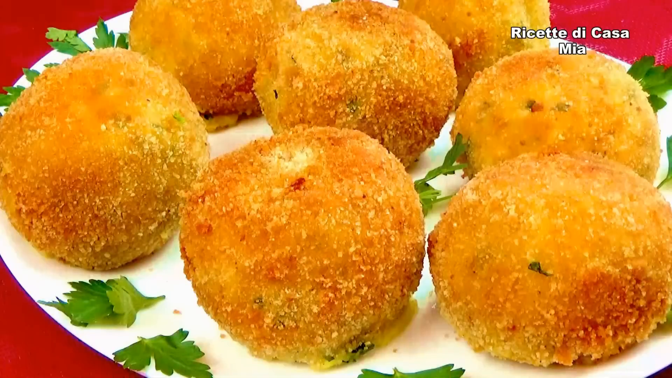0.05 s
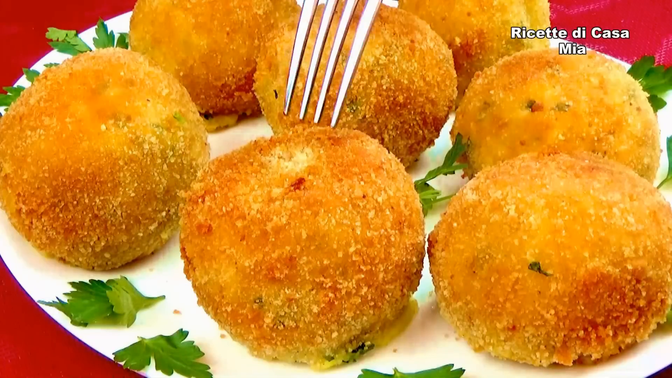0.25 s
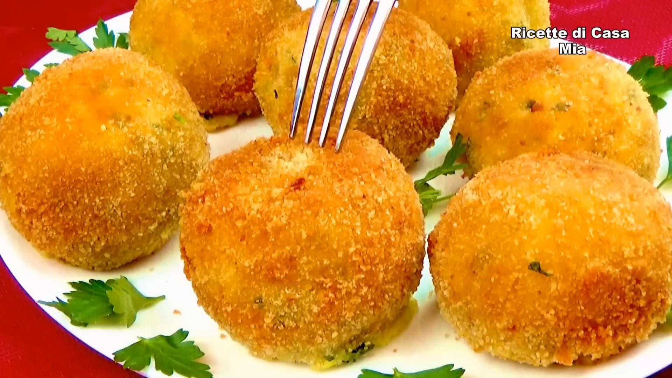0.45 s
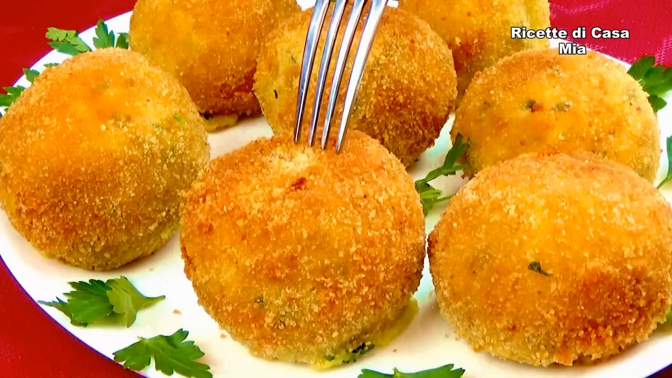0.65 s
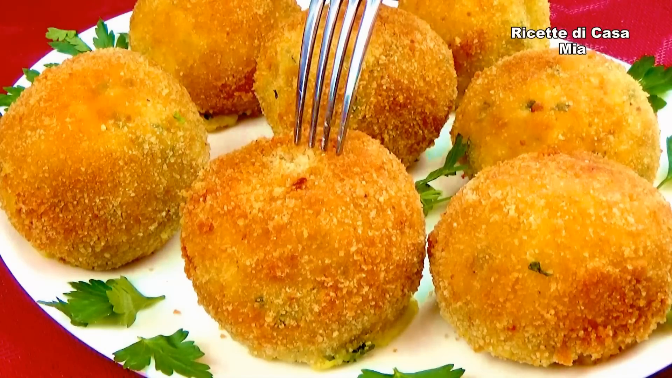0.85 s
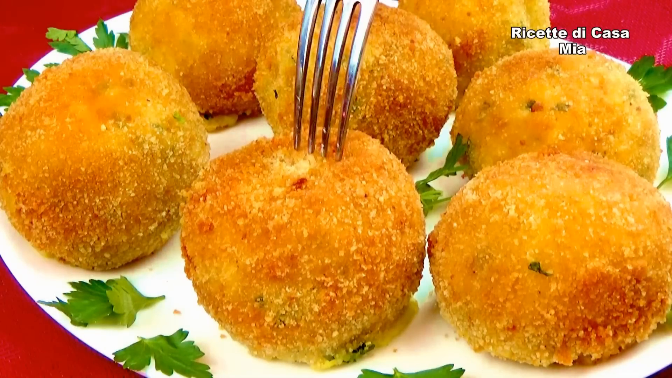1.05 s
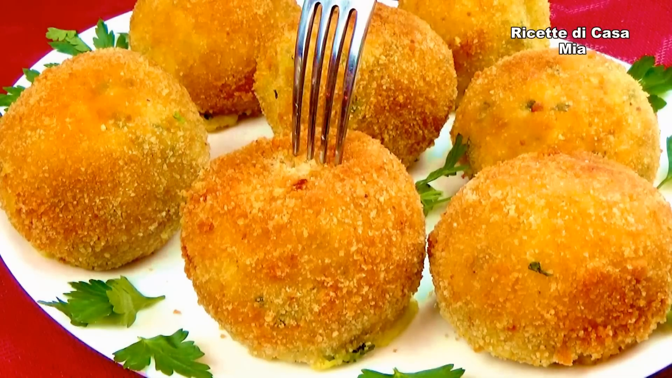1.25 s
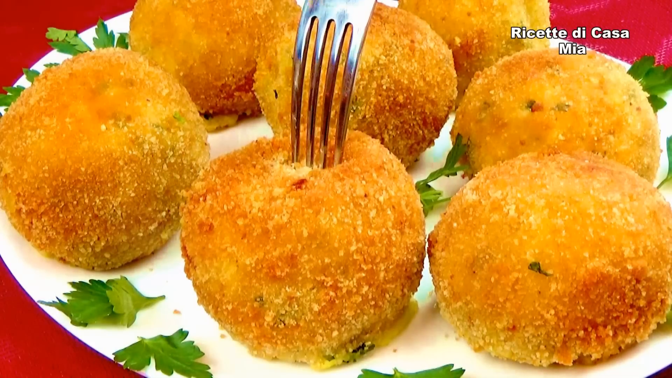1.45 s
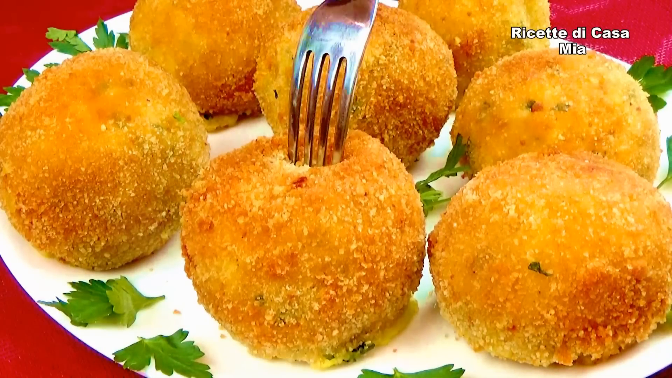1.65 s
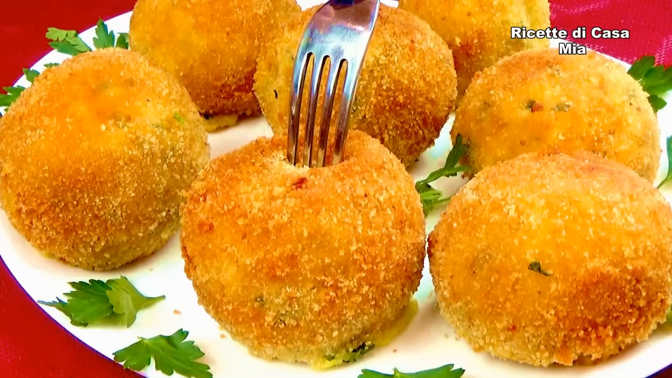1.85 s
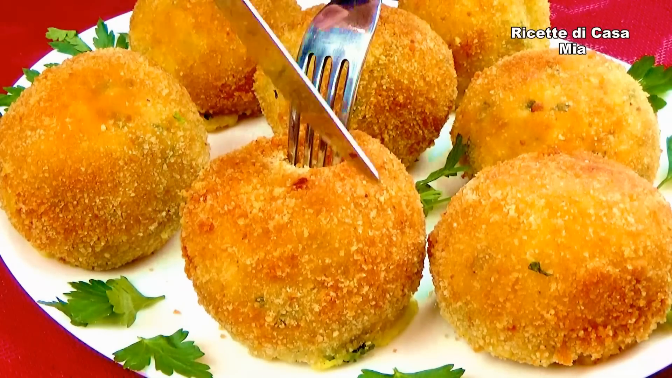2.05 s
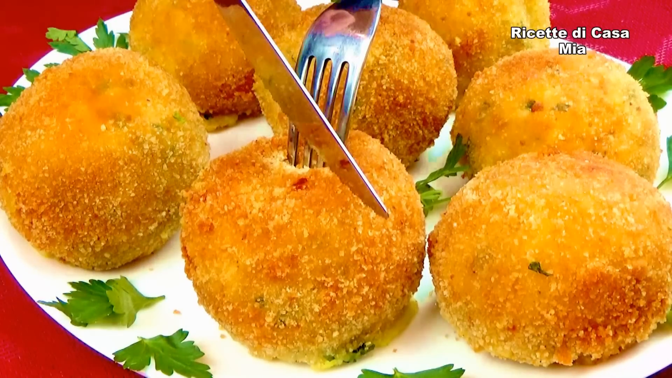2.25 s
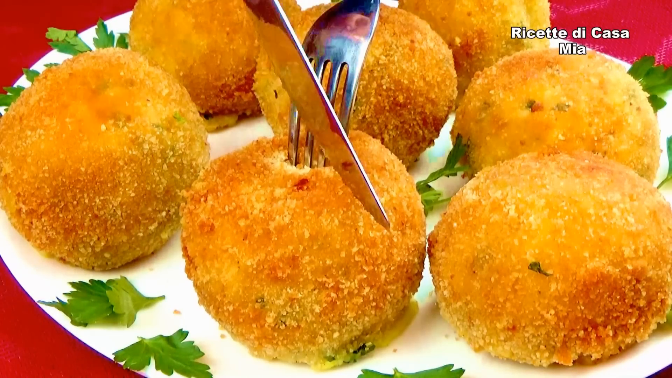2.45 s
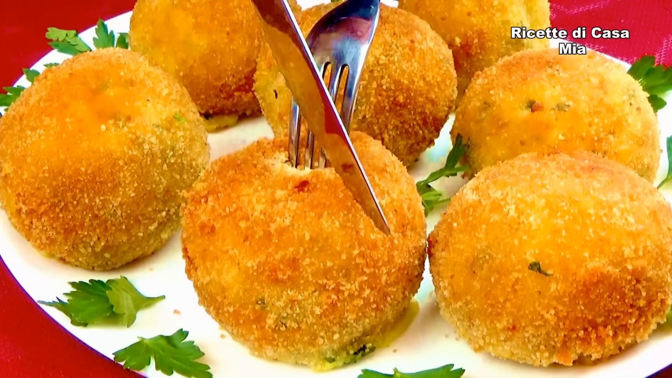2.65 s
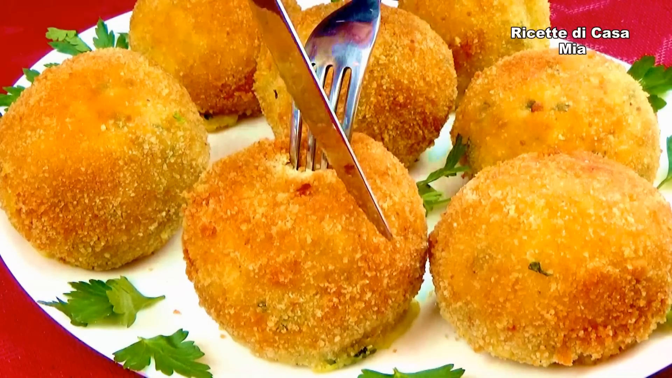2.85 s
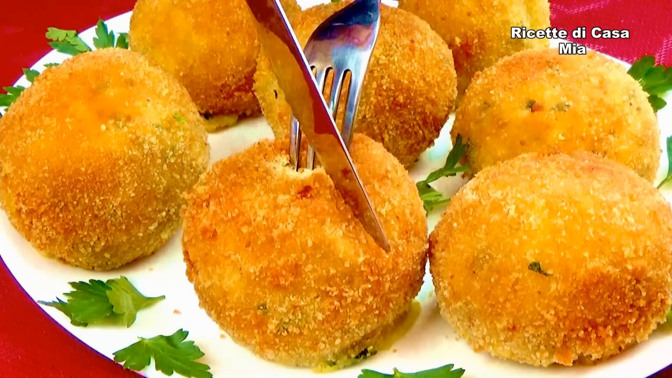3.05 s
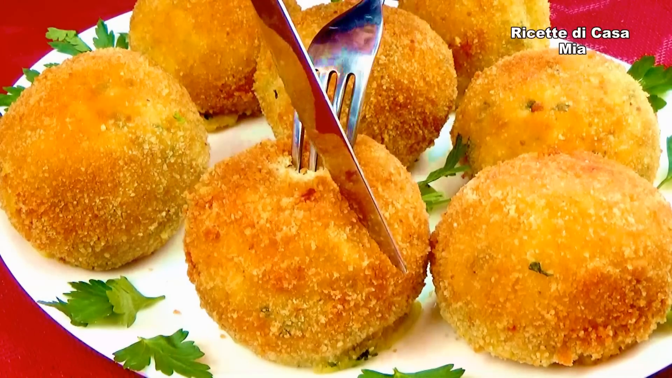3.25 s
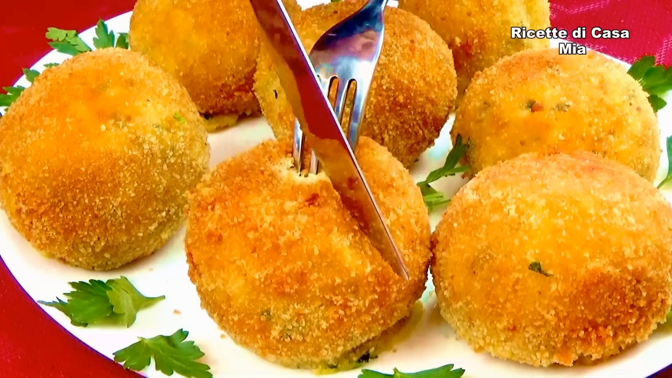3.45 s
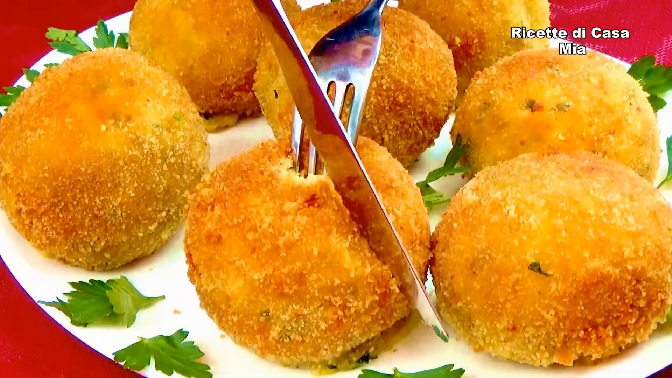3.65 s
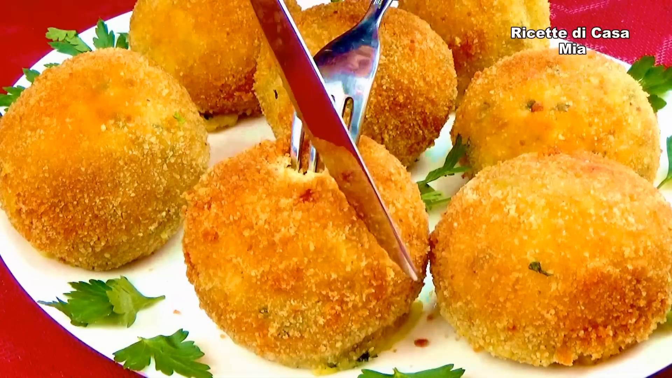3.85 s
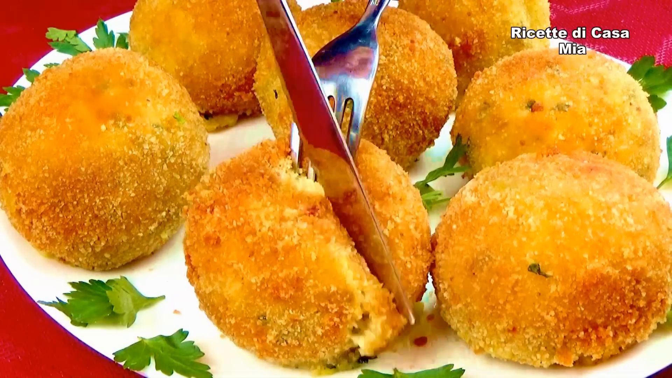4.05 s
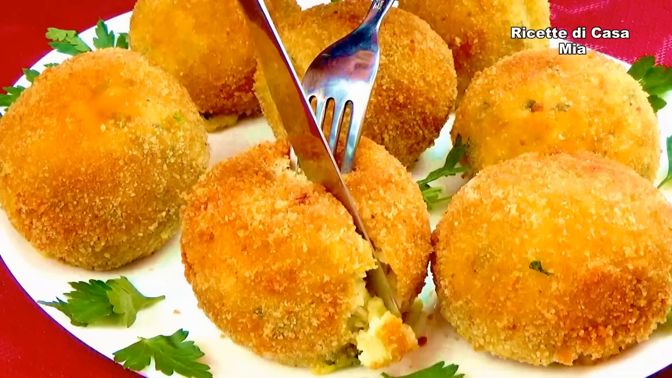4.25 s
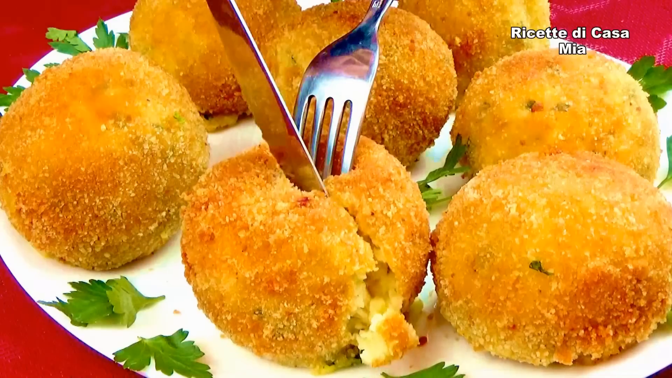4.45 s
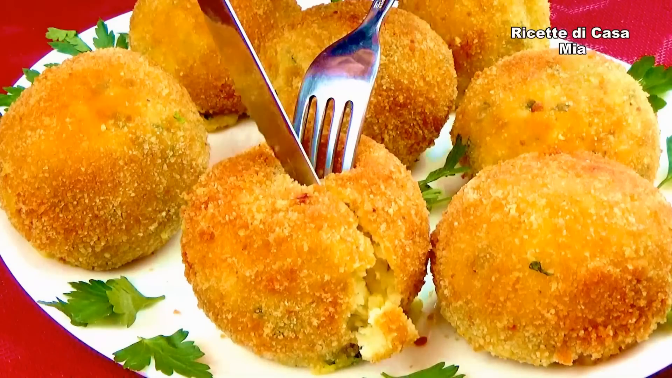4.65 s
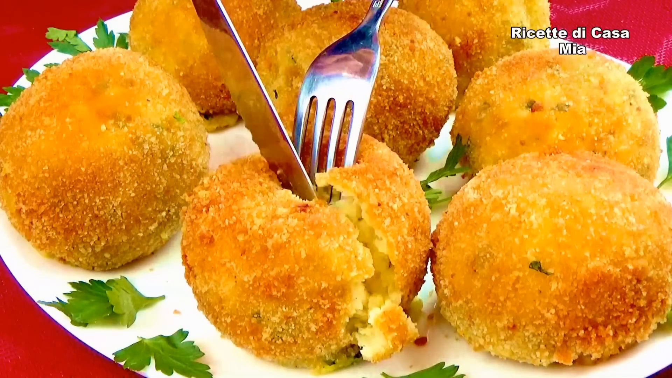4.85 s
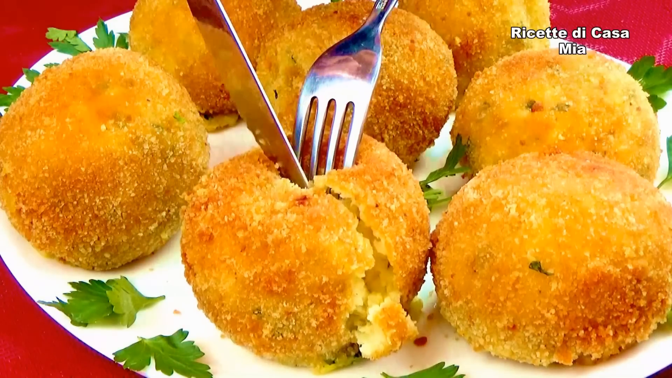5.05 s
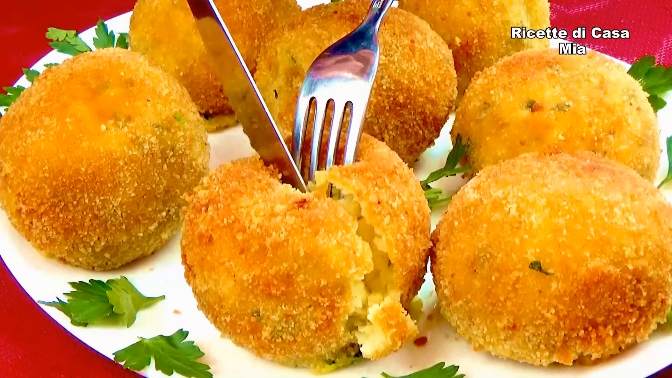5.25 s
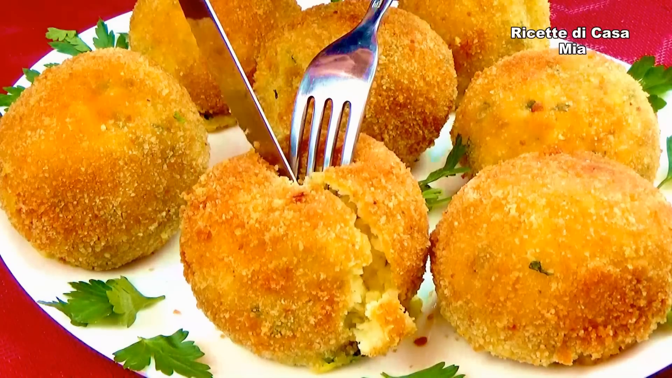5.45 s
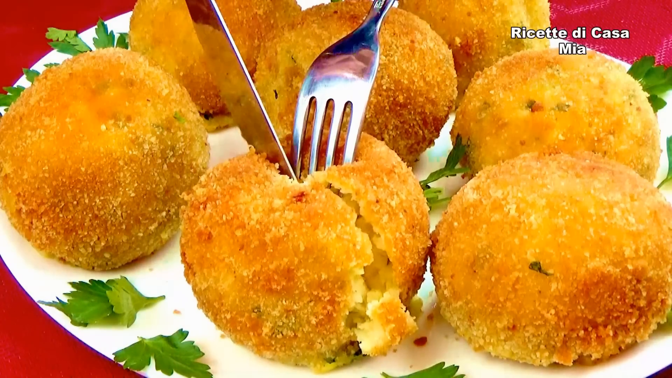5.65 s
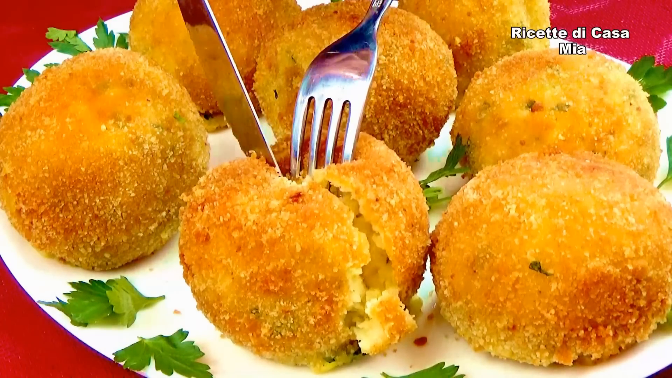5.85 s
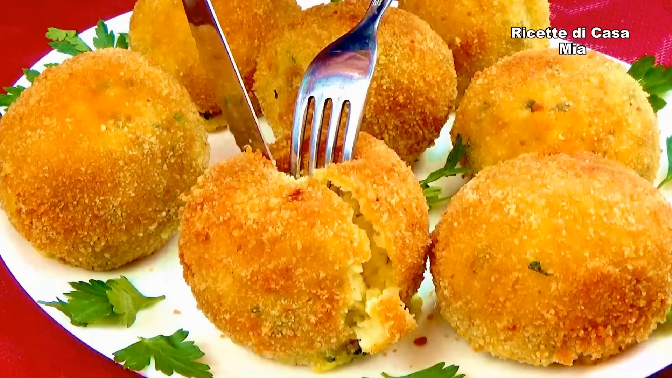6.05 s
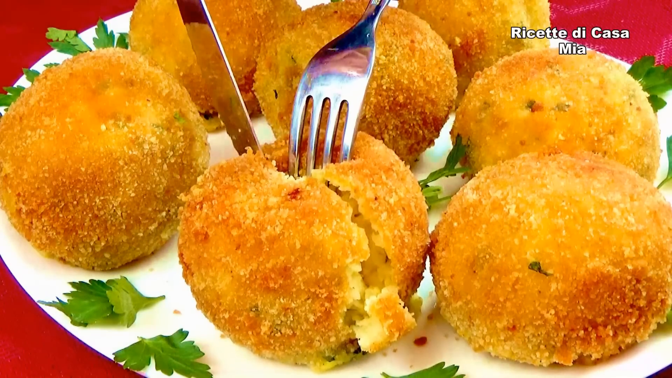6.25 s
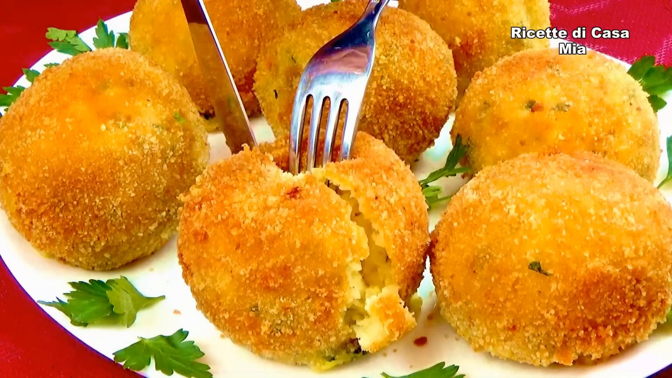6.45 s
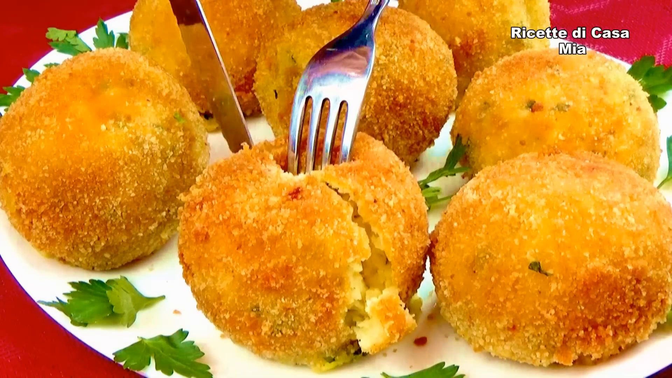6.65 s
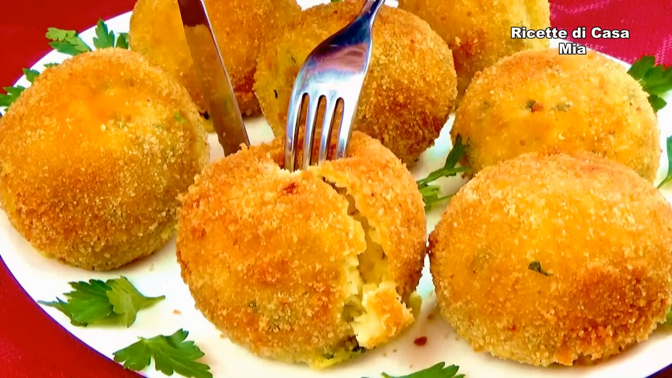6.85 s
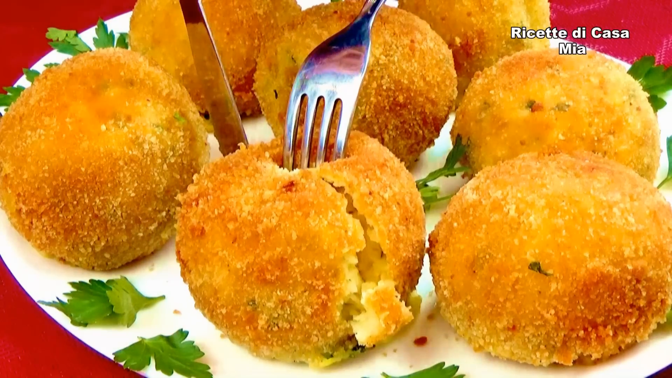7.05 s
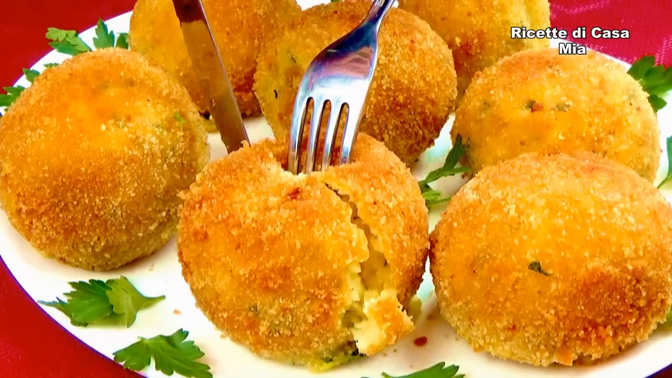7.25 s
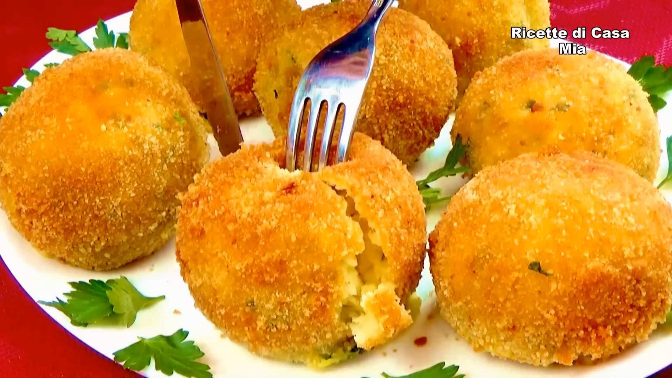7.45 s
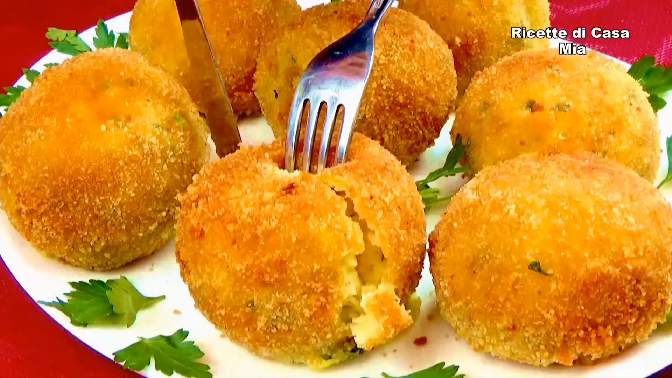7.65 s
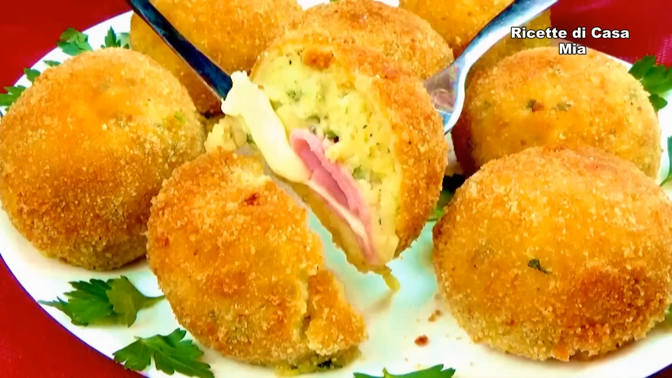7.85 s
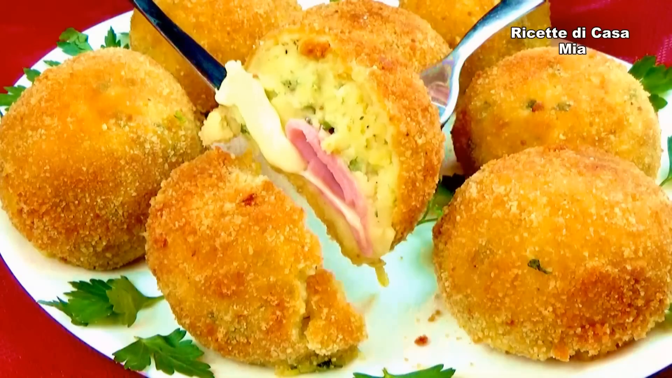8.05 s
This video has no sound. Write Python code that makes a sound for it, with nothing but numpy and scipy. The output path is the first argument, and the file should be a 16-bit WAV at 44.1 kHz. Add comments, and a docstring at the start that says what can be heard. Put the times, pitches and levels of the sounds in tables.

```python
"""A fork pierces a fried breadcrumb crust, then a knife saws through it on a plate in a quiet kitchen.
Stroke by stroke, clumps of random cracks ring crumbs, steel and hollow shell; pressure thuds in plate and table.
Rubs of filtered noise, triple-blow knocks and faint to loud cracks with splinter showers fall among the strokes.
Left and right slip by a few milliseconds throughout, over a short room tail, hiss, rumble and a faint trill.
The sound stops short before the end."""
import sys
import numpy as np
from scipy import signal
from scipy.io import wavfile
from scipy.ndimage import uniform_filter1d

SR = 44100
rng = np.random.default_rng(int(sys.argv[2]) if len(sys.argv) > 2 else 0)


def to_wav(s):
    """Save 16-bit WAV."""
    ch = np.atleast_2d(s).T  # columns
    pcm = np.round(np.clip(ch, -1, 1) * 32767)  # PCM
    wavfile.write(sys.argv[1], SR, pcm.astype(np.int16))


N = 357651


def gain_of(db):
    """Decibels to an amplitude factor."""
    return 10 ** (np.asarray(db) / 20)


def evened(x):
    """Scales to rms 1."""
    return x / np.sqrt(np.mean(x ** 2) + 1e-20)


def smooth_noise(span):
    """Slow random drift, rms 1: noise averaged over span samples."""
    return evened(uniform_filter1d(rng.standard_normal(N), size=span))


def curve(rows):
    """Every column of a table, interpolated sample by sample."""
    s, *columns = np.transpose(rows)
    return [np.interp(np.arange(N) / SR, s, c) for c in columns]


def colour(points):
    """Causal minimum-phase response with the given spectrum, energy 1."""
    f, db = np.transpose(points)
    hz = abs(np.fft.fftfreq(4096, 1 / SR))
    spectrum_db = np.interp(np.log(hz + 1), np.log(f + 1), db)
    log_gain = np.log(gain_of(np.maximum(spectrum_db, -100)))
    taps = np.fft.ifft(np.exp(np.conj(signal.hilbert(log_gain)))).real[:2048]
    return taps / np.linalg.norm(taps)


def ring(modes):
    """Response of damped modes, energy 1; the deep bass below the lowest mode is cut away."""
    t = np.arange(4096) / SR
    taps = 0
    for hz, width_hz, db in modes:
        decay = np.exp(-np.pi * width_hz * t)
        taps = taps + gain_of(db) * np.sqrt(width_hz) * decay * np.sin(2 * np.pi * hz * t)
    low_cut_hz = 0.48 * modes[0][0]
    taps = signal.lfilter(*signal.butter(3, low_cut_hz, "high", fs=SR), taps)
    return taps / np.linalg.norm(taps)


def through(x, taps):
    """Plays a signal through a response."""
    taps = np.reshape(taps, (1,) * (x.ndim - 1) + (-1,))
    return signal.oaconvolve(x, taps, axes=-1)[..., :N]


SLIP_STEP = 29.5  # samples


def slipping(x, piece_s, steps):
    """One channel: overlapping pieces, each shifted by some whole steps (rounded to samples)."""
    hop = round(piece_s * SR)
    window = np.hanning(2 * hop + 1)[:-1] ** 1.06
    padded, out = np.pad(x, 3 * hop), np.zeros(N + 6 * hop)
    starts = np.arange(hop, N + 3 * hop, hop)
    whole_steps = np.round(steps * rng.standard_normal(len(starts)))
    shifts = np.round(SLIP_STEP * whole_steps).astype(int)
    for at, shift in zip(starts, np.clip(shifts, -hop, hop)):
        out[at:at + 2 * hop] += window * padded[at + shift:at + shift + 2 * hop]
    return out[3 * hop:3 * hop + N]


def slipping_pair(x):
    """The same sound slipping separately in each channel."""
    return np.array([slipping(x, piece_s=.02, steps=3.0) for _ in range(2)])


# room tone spectrum: (frequency [Hz], level [dB per Hz])
ROOM_SPECTRUM = [(15, -34.5), (25, 0), (195, 2.5), (988, -0.5), (1370, 0), (2000, -4), (3720, -7.5),
                 (8590, -11.5), (16000, -19.5)]
ROOM_TONE_DB = -65  # before the output gain


def room_tone():
    """Gently drifting hiss and rumble: coloured noise, unrelated in the two channels."""
    noise = rng.standard_normal((2, N))
    level_db = ROOM_TONE_DB + .8 * smooth_noise(9000)
    return gain_of(level_db) * through(noise, colour(ROOM_SPECTRUM))


def chirr():
    """Faint high trill: a sine that throbs unevenly and comes and goes, in quadrature left to right."""
    t = np.arange(N) / SR
    waxing, drift = smooth_noise(9000), smooth_noise(9000)
    throb_hz = 36 + 6.0 * drift
    throb = np.maximum(np.sin(2 * np.pi * np.cumsum(throb_hz) / SR), 0) ** 2
    tone = np.sin(2 * np.pi * 3710 * t + [[0], [np.pi / 2]])
    return gain_of(-72.0 + 5.3 * waxing) * throb * tone


def kitchen(x):
    """Adds a faint short tail from plate, table and walls: sparse echoes falling 60 dB in 53 ms."""
    t = np.arange(8000) / SR
    echoes = rng.choice([-1., 1.], 8000) * (rng.random(8000) < .05)
    tail = echoes * gain_of(-60 * t / 0.053) * (t > .002)
    return x + gain_of(-14.0) * through(x, tail / np.linalg.norm(tail))


# soft rubs of cutlery on the crust: (start [s], length [s], relative level [dB], pitch [Hz])
RUB_EVENTS = [(0.486, 0.076, -59, 835), (1.073, 0.088, -61, 820), (1.508, 0.075, -52.5, 1130),
              (1.667, 0.046, -58.5, 860), (2.27, 0.042, -57.5, 760), (7.199, 0.057, -64, 520)]


def rubs():
    """Short swells of friction: noise through a damped pitch and a broad mode above it."""
    out = np.zeros(N)
    for s, length_s, db, hz in RUB_EVENTS:
        friction = rng.standard_normal(round(length_s * SR))
        modes = [(hz, 0.17 * hz, 0), (4.66 * hz, 1800, -5)]
        tone = through(friction, ring(modes))[:len(friction)]
        swell = signal.windows.tukey(len(tone), .6)
        out[round(s * SR):][:len(tone)] += gain_of(db) * tone * swell
    return slipping_pair(out)


# hollow knocks as steel prods the crust or a slab gives way: (time [s], relative level [dB], pitch [Hz])
KNOCK_EVENTS = [(0.147, -30.5, 580), (0.426, -30, 253), (2.381, -36, 850), (3.652, -14, 645),
                (3.799, -20, 1140), (4.0605, -14, 836), (6.325, -17, 196), (6.765, -30, 233),
                (6.957, -20, 476), (6.959, -16.5, 3270), (7.423, -28, 211), (7.578, -37.5, 666)]


def knocking():
    """Each knock: three quick blows into one damped pitch."""
    out = np.zeros(N)
    gaps = rng.integers(40, 170, (len(KNOCK_EVENTS), 2))  # samples
    for (s, db, hz), (a, b) in zip(KNOCK_EVENTS, gaps):
        blow = gain_of(db) * ring([(hz, 30 + 0.22 * hz, 0)])
        for late in (0, a, a + b):
            out[round(s * SR) + late:][:4096] += blow
    return slipping_pair(out)


def breaking(per_s, spread_db, clump_db, clump_s):
    """Random cracks of uneven size in clumps, levelled to a steady local rms."""
    span = max(round(clump_s * SR), 2)
    clumps = evened(uniform_filter1d(smooth_noise(span), span))
    size_db = spread_db * np.minimum(rng.exponential(1, N), 4) + clump_db * clumps
    hits = rng.choice([-1., 1.], N) * (rng.random(N) < per_s / SR)
    train = gain_of(size_db) * hits
    return train / np.sqrt(uniform_filter1d(train ** 2, size=4000) + 1e-9)


# plate modes: (frequency [Hz], width [Hz], relative level [dB])
PLATE_MODES = [(139.7, 59, -18), (252, 132, 10), (520, 280, 2)]


def thud(pressure, flexing):
    """Pressure rings the plate; pressure and the flexing shell drive the table top."""
    bearing = np.clip(np.arange(N) / SR - 1.2, .1, 1)  # the table booms once the fork bears down
    drive = gain_of(-23) * flexing + gain_of(-8.5) * bearing * pressure
    table = through(drive, ring([(75.6, 160, 0)]))
    return through(pressure, ring(PLATE_MODES)) + table


def piecewise(x, modes):
    """Shell as many pieces: each moment one rings at random, smaller or larger."""
    scales = 1.092 ** np.arange(-1, 4)
    piece = np.repeat(rng.integers(0, len(scales), N // 500 + 1), 500)[:N]
    out = 0
    for k, scale in enumerate(scales):
        scaled = [(hz * scale, width_hz, db) for hz, width_hz, db in modes]
        out = out + through(x * (piece == k), ring(scaled))
    return out


# lower and higher shell modes: (frequency [Hz], width [Hz], relative level [dB])
LOW_SHELL_MODES = [(716, 2600, -11.5), (1209, 380, 12)]
HIGH_SHELL_MODES = [(1905, 1100, 6.5), (3075, 2000, 0)]


def creak(flexing, high_share):
    """Flexing rings the lower and higher shell modes, sharing power."""
    low = through(flexing * np.sqrt(1 - high_share), ring(LOW_SHELL_MODES))
    return low + piecewise(flexing * np.sqrt(high_share), HIGH_SHELL_MODES)


# cutlery modes: (frequency [Hz], width [Hz], relative level [dB])
STEEL_MODES = [(4860, 120, -2.5), (5730, 140, 8.5), (7550, 45, -12), (8870, 120, 6)]


def steel(crumbs, steel_db):
    """Crumb cracks ring the cutlery; the ring flickers at random in strength."""
    flicker = smooth_noise(1300)
    return through(crumbs * gain_of(steel_db + 2.5 * flicker), ring(STEEL_MODES))


CRUMB_SIZES_HZ = np.geomspace(3000, 12500, num=5)  # large crumbs ring low, small ones high


def by_size(crumbs):
    """Neighbouring cracks belong to one crumb, whose size tints them."""
    size = np.repeat(rng.integers(0, len(CRUMB_SIZES_HZ), N // 90 + 1), 90)[:N]
    tinted = 0
    for k, hz in enumerate(CRUMB_SIZES_HZ):
        tinted = tinted + through(crumbs * (size == k), ring([(hz, 0.59 * hz, 0)]))
    return 0.56 * crumbs + 0.5 * tinted


# spectra of one dry and one soft damp crumb breaking: (frequency [Hz], level [dB per Hz])
DRY_SPECTRUM = [(1060, -25.5), (1800, -4), (2720, -13), (5200, 0.5), (6900, 1), (9000, 3), (12300, -3.5),
                (16000, -19.5)]
DAMP_SPECTRUM = [(1000, -11.5), (3700, -3.5), (6000, -5.5), (10000, -20.5), (16000, -31)]


def crackle(crumbs, damp):
    """Crumbs break in air: dry ones tinted by size, damp ones duller, sharing power."""
    dry_crumbs = through(by_size(crumbs * np.sqrt(1 - damp)), colour(DRY_SPECTRUM))
    return dry_crumbs + through(crumbs * np.sqrt(damp), colour(DAMP_SPECTRUM))


# cracks and ticks, faint to loud:
# (time [s], relative snap level [dB], relative shell level [dB], run of the crack [ms])
CRACK_EVENTS = [(1.1663, -24.5, -21.5, 9.8), (1.2551, -18.5, -24, 29.5), (1.2718, -14.5, -22, 6.4),
                (1.29, -33, -30, 13), (1.462, -35, -26, 21.4), (1.8105, -36.5, -38, 20),
                (2.049, -34.5, -58, 10), (2.096, -34.5, -36.5, 17), (2.1178, -37, -44, 35),
                (2.138, -37, -44, 23), (2.213, -34.5, -47, 26), (2.262, -39, -41, 18),
                (2.3713, -37, -50, 35), (2.425, -28, -30.5, 51), (2.4895, -35.5, -46, 26),
                (2.7398, -29, -34, 11), (2.7645, -22, -25.5, 21), (2.961, -56, -23, 28),
                (3.064, -27, -35, 9.6), (3.183, -12.5, -15, 35), (3.1969, -7, -6, 31.4),
                (3.274, -22, -25, 37), (3.3102, -17, -19, 26), (3.3712, -25, -29, 23),
                (3.5017, -7, -9.5, 43), (3.528, -14, -29, 23), (3.547, -11, -12, 37),
                (3.5891, -8.5, -13, 24), (3.643, -11.5, -14, 68), (3.718, -27, -47, 18),
                (3.8004, -27, -26.5, 33), (3.851, -40, -25, 9.2), (3.868, -22.5, -30, 30),
                (3.902, -25.5, -25.5, 14), (3.9445, -28, -50, 9.7), (4.0173, -16.5, -24.5, 18),
                (4.0608, -16, -15, 6.5), (4.08, -20, -28.5, 39), (4.091, -6.5, -28, 17),
                (4.1438, -22, -41.5, 20), (4.4819, -11, -14, 38), (4.508, -12.5, -12, 53),
                (4.5291, -8.5, -13.5, 9.8), (4.786, -12.5, -14.5, 39), (4.8274, -17.5, -14, 24),
                (4.848, -14.5, -25.5, 39), (4.887, -12.5, -18, 27.5), (4.9098, -17, -22, 27),
                (4.9351, -16, -18.5, 12), (5.144, -29, -43, 22), (5.1586, -27, -14, 11.6),
                (5.188, -27, -15, 38), (5.206, -27, -12, 17), (5.239, -10.5, -5.5, 38),
                (5.2742, -14, -22, 14), (5.4966, -16.5, -22, 11), (5.525, -21, -13.5, 23),
                (5.542, -21, -9, 57), (5.587, -21, -12.5, 7.9), (5.7245, -20, -43, 22),
                (5.856, -27, -18.5, 12), (6.323, -43, -15.5, 19), (6.338, -14.5, -27, 8),
                (6.351, -12, -48, 7.5), (6.3987, -22, -53, 14), (6.583, -25, -60, 40),
                (6.7108, -30.5, -35, 2.7), (6.727, -36, -34, 4.4), (6.775, -41, -23.5, 9.9),
                (6.9244, -21.5, -40, 10), (7.46, -49, -29, 11), (7.808, -57, -36.5, 7.9)]


def bursts(steps):
    """Cracks and ticks: a break, sudden if short, swelling in if long, then a dying splinter shower."""
    length = 3000
    out, t_ms = np.zeros((2, 2, N + length)), 1000 * np.arange(length) / SR  # (layer, side, sample)
    for s, snap_db, shell_db, run_ms in CRACK_EVENTS:
        shower = rng.standard_normal(length) * (rng.random(length) < .15)
        lag = np.round(steps * rng.standard_normal()) * SLIP_STEP  # between left and right
        burst = shower * gain_of(-10.5 - 60 * (t_ms / run_ms) ** 1.173)  # runs on before it dies
        sudden = min((23 / run_ms) ** 3, 1)
        burst *= np.minimum(sudden + t_ms / (0.11 * run_ms), 1)
        burst[0] = sudden
        for side, late in enumerate((max(lag, 0), max(-lag, 0))):
            at = round(s * SR + late)
            out[:, side, at:at + length] += gain_of([[snap_db], [shell_db]]) * burst
    return out[..., :N]


# strokes of fork and knife: (full pressure reached [s], build-up [s], hold [s],
# relative crackle of crumbs [dB], relative creak of the shell [dB], relative thud [dB])
STROKE_EVENTS = [(0.147, .01, 0.068, -89, -62.5, -55), (0.286, 0.077, 0.14, -94, -68, -56),
                 (0.417, 0.028, 0.011, -62.5, -62, -54.5), (0.833, 0.011, 0.022, -61.5, -60, -51),
                 (0.982, 0.038, 0.051, -62, -92, -92), (1.253, 0.011, 0.051, -46, -50.5, -54),
                 (1.388, 0.033, 0.019, -56, -55.5, -68), (1.53, 0.15, 0.019, -52, -55, -64),
                 (1.684, 0.044, 0.046, -59, -63, -75), (2.096, 0.027, 0.029, -63, -64, -61),
                 (2.42, 0.18, 0.027, -70, -73, -66), (2.763, 0.016, 0.0069, -47.5, -51.5, -63),
                 (2.832, 0.026, 0.019, -53.5, -56, -74), (2.958, 0.011, 0.047, -49, -53.5, -60),
                 (3.194, 0.03, 0.028, -41, -41, -51.5), (3.448, 0.037, 0.049, -56, -57.5, -66),
                 (3.509, 0.026, 0.099, -44.5, -44, -50), (3.648, 0.038, 0.0089, -42.5, -47.5, -47),
                 (3.786, 0.11, 0.057, -50.5, -47, -57), (3.96, 0.072, 0.14, -51.5, -52, -59.5),
                 (4.078, 0.087, 0.036, -35.5, -42, -53), (4.2, 0.081, 0.089, -56.5, -55, -68),
                 (4.501, 0.1, 0.0048, -39, -39, -53), (4.63, 0.17, 0.048, -48.5, -48, -58),
                 (4.764, 0.036, 0.0045, -53.5, -51, -58), (4.827, 0.029, 0.1, -52, -44, -55.5),
                 (4.997, 0.1, 0.073, -51, -46, -54), (5.174, 0.035, 0.083, -46, -43.5, -54.5),
                 (5.361, 0.074, 0.028, -51, -44.5, -58), (5.527, 0.091, 0.051, -45.5, -42.5, -54.5),
                 (5.661, 0.047, 0.055, -47.5, -47, -58.5), (5.873, 0.11, 0.015, -48.5, -44, -54.5),
                 (5.93, 0.028, 0.011, -51.5, -47.5, -61.5), (6.057, 0.036, 0.072, -58.5, -55.5, -64.5),
                 (6.238, 0.025, 0.055, -59.5, -58.5, -62), (6.308, 0.06, 0.092, -53.5, -46.5, -49.5),
                 (6.555, 0.19, 0.058, -62.5, -60.5, -67), (6.764, 0.1, 0.0093, -63, -50.5, -49.5),
                 (6.914, 0.21, 0.044, -54.5, -47.5, -50), (7.417, 0.0047, 0.047, -60, -54, -56),
                 (7.578, 0.02, 0.081, -67, -65.5, -70)]
# release rates: (crackle [dB/s], creak [dB/s], thud [dB/s])
RELEASE_RATES = (326, 272.5, 238.5)
BUILD_DB = 25.5  # gained over the build-up


def strokes():
    """Strokes build up, hold and let go; overlaps add power. One envelope per layer."""
    t, power = np.arange(0, N / SR, .002), 0
    for s, build_s, hold_s, *levels_db in STROKE_EVENTS:
        rise_db = BUILD_DB * np.minimum(t - s, 0) / max(build_s, .004)
        fall_db = np.outer(RELEASE_RATES, np.maximum(t - s - hold_s, 0))
        power = power + gain_of(np.array(levels_db)[:, None] + rise_db - fall_db) ** 2
    return [np.interp(np.arange(N) / SR, t, np.sqrt(p)) for p in power]


# changing colour over time: (time [s], share of the higher shell modes [0-1],
# relative ring of the steel [dB], share of soft damp crumbs [0-1])
COLOUR_CHANGES = [(0, 0.08, -35, 0), (2.04, 0.15, -32, 0.6), (2.13, 0.03, -0.5, 0.7),
                  (2.75, 0.33, -30, 0.06), (3.1, 0.15, -14, 0.27), (3.79, 0.18, -8.5, 0),
                  (3.86, 0.06, 1, 0.07), (3.93, 0.27, -12, 0.02), (4.3, 0.46, -12, 0),
                  (4.45, 0.92, -20, 0.29), (5.9, 0.63, -13, 0.15), (6.4, 0.72, -9.5, 0.2),
                  (6.96, 0.72, -8.5, 0.86), (7.8, 0.84, -27, 0.82)]


def crust():
    """Strokes, cracks and ticks excite crumbs, steel, shell, plate and table."""
    crackling, creaking, thudding = strokes()
    high_share, steel_db, damp = curve(COLOUR_CHANGES)
    high_share, damp = np.clip(high_share, 0, 1), np.clip(damp, 0, 1)
    snaps, shell_cracks = bursts(steps=2.6)
    small_cracks = breaking(per_s=4000, spread_db=4.86, clump_db=4.85, clump_s=0.0047)
    crumbs = slipping_pair(crackling * small_cracks) + snaps
    shell_creaks = breaking(per_s=4000, spread_db=4.9, clump_db=3.3, clump_s=0.0018)
    flexing = slipping_pair(creaking * shell_creaks) + shell_cracks
    jolts = breaking(per_s=600, spread_db=1.2, clump_db=2.1, clump_s=0.01)
    pressure = slipping_pair(thudding * jolts)
    return crackle(crumbs, damp) + steel(crumbs, steel_db) + creak(flexing, high_share) + thud(pressure, flexing)


def scene():
    """The cutting with its room tail, over room tone and trill, in both channels."""
    cutting = kitchen(crust() + rubs() + knocking())
    return gain_of(3.0) * (cutting + room_tone() + chirr())


STOP_S, FADE_S, EDGE_HZ = 7.824, .002, 15950


def record(dry):
    """Cuts the sound off within two milliseconds, then low-passes it."""
    kept = dry * np.clip((STOP_S - np.arange(N) / SR) / FADE_S, 0, 1)
    low_pass = signal.firwin(511, EDGE_HZ, window=("kaiser", 9), fs=SR)
    return signal.oaconvolve(kept, low_pass[None], "same")


dry = scene()
out = record(dry)
to_wav(out)
```